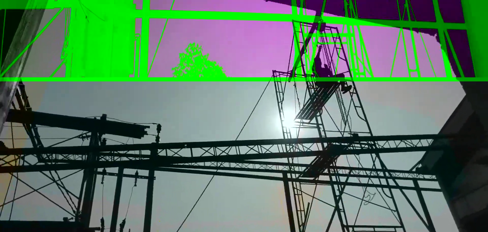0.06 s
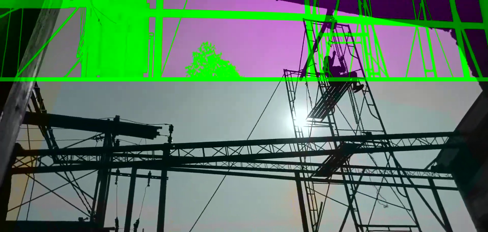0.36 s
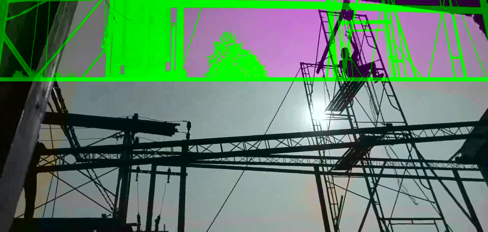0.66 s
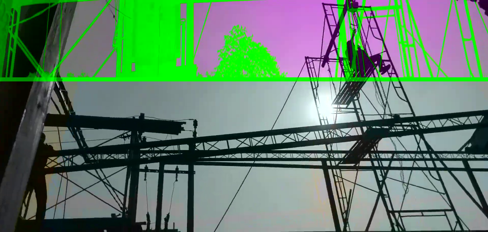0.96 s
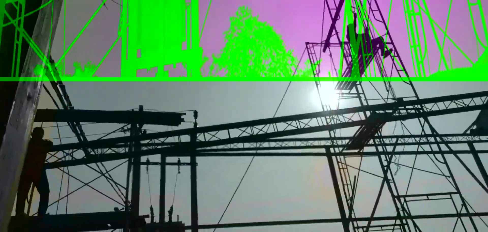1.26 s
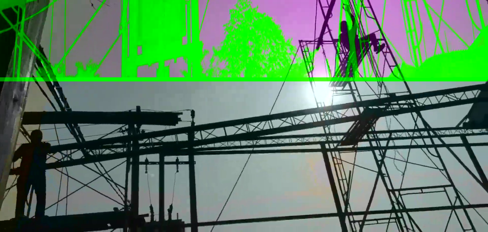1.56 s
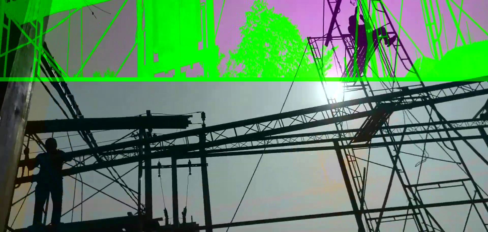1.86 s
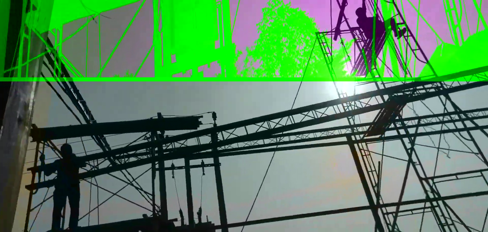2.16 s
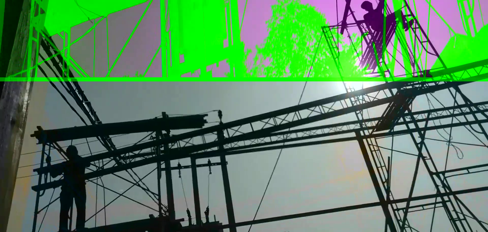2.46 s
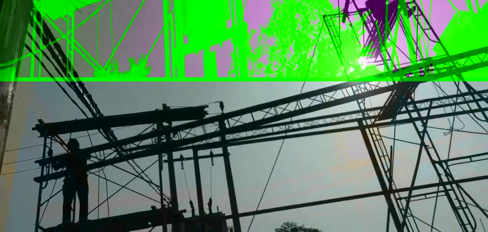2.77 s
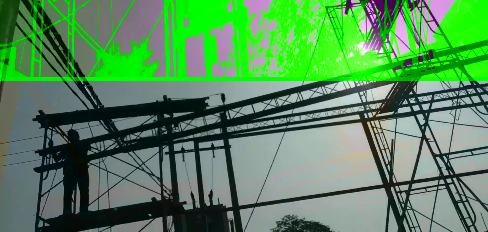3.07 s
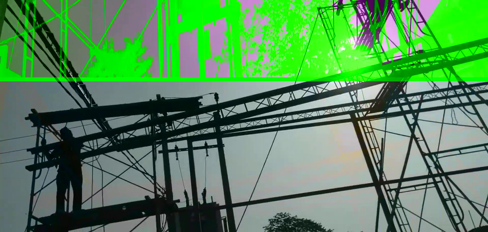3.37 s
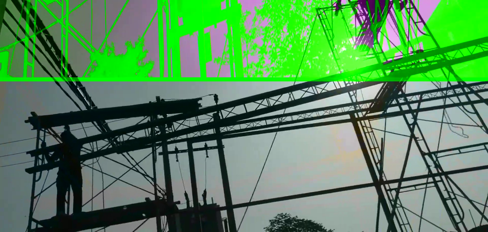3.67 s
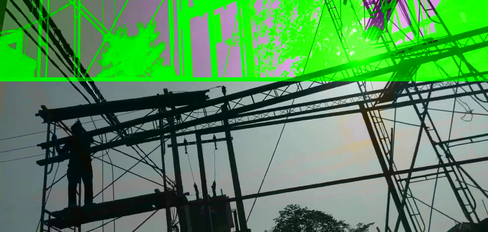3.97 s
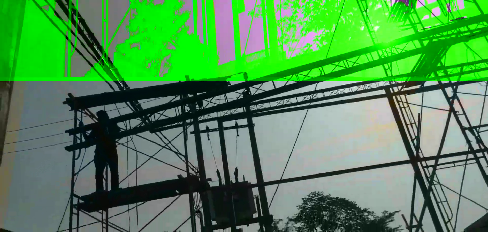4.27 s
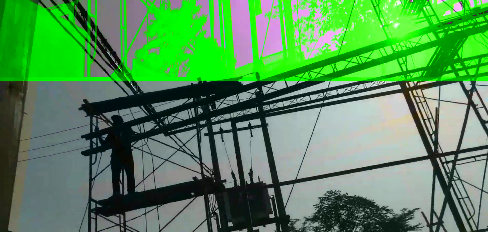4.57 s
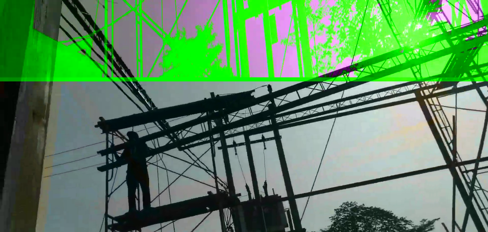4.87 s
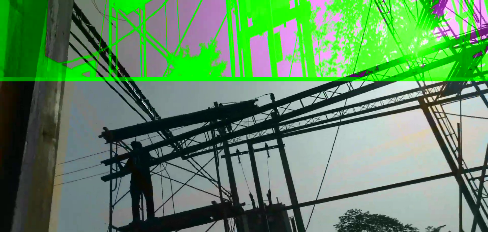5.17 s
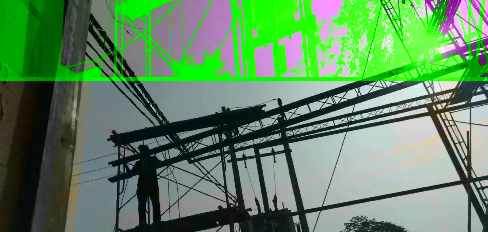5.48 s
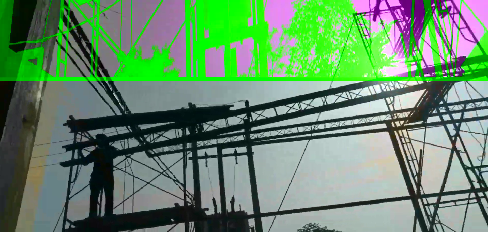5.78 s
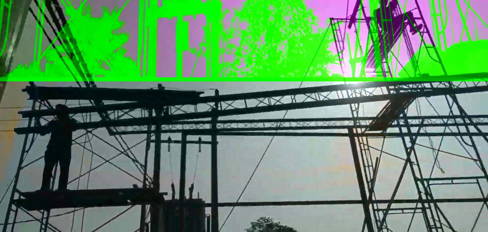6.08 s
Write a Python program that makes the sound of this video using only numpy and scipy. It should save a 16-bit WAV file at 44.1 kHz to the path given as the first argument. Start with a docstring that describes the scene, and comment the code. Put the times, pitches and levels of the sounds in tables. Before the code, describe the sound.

Chain links jingle and rattle as a hoist is hauled, while slack chain scrapes and clanks against steel scaffolding.

```python
"""Chain hoist raising a steel truss

A hand chain is hauled about twice a second up on scaffolding: links rattle over the wheel and ring
the housing. Slack chain drags, clashes and squeals on the steelwork, and the load knocks against the
frame. Walls echo it all over a low town rumble, heard from the ground through a mono phone."""
import sys
import numpy as np
from scipy import signal
from scipy.fft import rfft, irfft
from scipy.io import wavfile
from scipy.ndimage import uniform_filter1d

SR = 44100
rng = np.random.default_rng(int(sys.argv[2]) if len(sys.argv) > 2 else 0)


def wav_out(sig):
    """Save sig, one row per channel (or a flat mono array), as 16-bit PCM at SR to the path in sys.argv[1]."""
    wavfile.write(sys.argv[1], SR, np.round(np.clip(np.atleast_2d(sig).T, -1, 1) * 32767).astype(np.int16))


N = 270754
TIME = np.arange(N) / SR


def undb(db):
    """Decibels to gain."""
    return 10 ** (np.asarray(db) / 20)


def unit(x):
    """Scale to an rms of one."""
    return x / np.sqrt(np.mean(x ** 2))


def fade(t, t60):
    """Exponential decay by 60 dB in t60 seconds."""
    return np.exp(-np.log(1000) * t / t60)


def swell(middle, db, half_length):
    """A bell-shaped envelope that grows and dies away evenly around its middle."""
    return undb(db) * np.exp(-.5 * ((TIME - middle) / half_length) ** 2)


def gestures(rows, rest_db):
    """Envelope of overlapping swells over a resting level; their powers add."""
    return np.sqrt(undb(rest_db) ** 2 + sum(swell(*row) ** 2 for row in rows))


def drift(rate):
    """Smooth random modulation with an rms of one, taking a new turn `rate` times a second."""
    hold = int(SR / rate)
    steps = np.repeat(rng.standard_normal(N // hold + 1), hold)
    return unit(uniform_filter1d(steps, hold)[:N])


def convolve(x, response):
    """Pass a sound through an impulse response."""
    return signal.oaconvolve(x, response)[:len(x)]


def equalise(x, points, size=8192):
    """Minimum-phase EQ through (frequency [Hz], gain [dB]) points."""
    hz, db = np.transpose(points)
    bins_hz = np.fft.rfftfreq(size, 1 / SR)
    gain = undb(np.interp(np.log(bins_hz + 1), np.log(hz), db))
    cepstrum = irfft(np.log(gain))
    cepstrum[1:size // 2] *= 2  # folded forward, so nothing rings ahead of a hit
    cepstrum[size // 2 + 1:] = 0
    return convolve(x, irfft(np.exp(rfft(cepstrum))))


def below(x, hz):
    """The part of a sound under a frequency."""
    return signal.sosfiltfilt(signal.butter(2, hz, fs=SR, output="sos"), x)


def resonate(x, hz, width_hz, db=0, passes=1):
    """Ring one resonance; every pass steepens its skirts and applies the gain again."""
    for _ in range(passes):
        x = undb(db) * signal.lfilter(*signal.iirpeak(hz, hz / width_hz, SR), x)
    return x


def contacts(rate, spread_db):
    """Tiny impacts of uneven size, about `rate` a second."""
    hits = rng.random(N) < rate / SR
    polarity = rng.choice([-1, 1], N)
    sizes = undb(spread_db * np.clip(rng.standard_normal(N), -2, 2))
    return unit(hits * polarity * sizes)


def add(track, time, sound):
    """Mix a sound in at a time in seconds."""
    start = int(time * SR)
    track[start:start + len(sound)] += sound[:N - start]


def jingle(strikes, t60, links, modes=32):
    """Each link has its own high modes; from moment to moment another link is struck."""
    t, out = TIME[:SR // 8], np.zeros(N)
    struck_link = rng.integers(links, size=N)[np.arange(N) // 32]  # a new pick every 32 samples
    for link in range(links):
        hz = rng.uniform(2600, 15800, (modes, 1))
        partials = rng.choice([-1, 1], (modes, 1)) * np.sin(2 * np.pi * hz * t)
        ring = partials.sum(0) * fade(t, t60)
        out += convolve(strikes * (struck_link == link), ring)
    return unit(out)


# Hauls on the hand chain, each speeding up and easing off (peak time [s], level [dB], half length [s])
HAND_PULLS = [(0.0, -17, 0.052), (.2, -19.5, 0.073), (.53, -20, .11), (1.04, -18, 0.14), (1.5, -26, 0.11),
              (2.03, -18.5, 0.14), (2.5, -17.5, 0.14), (2.94, -17, 0.18), (3.44, -18, 0.15),
              (3.99, -19.5, 0.18), (4.39, -16, 0.15), (4.83, -15, 0.17), (5.28, -16.5, 0.16),
              (5.7, -17, 0.18), (6.13, -17.5, .11)]
# Bright, thin EQ of the running links (frequency [Hz], gain [dB])
RATTLE_EQ = [(300, -67), (2200, -11), (2900, -8.5), (5000, -4.5), (7500, 1.5), (10500, -2), (13000, -5.5),
             (16000, -9)]
# Ring of the hoist housing (frequency [Hz], width [Hz], gain per pass [dB])
HOUSING_MODES = [(421, 42, -10.5), (848, 260, -11.5), (1366, 170, -7), (1850, 170, -11), (2459, 116.4, -5),
                 (2962, 90, -3.5), (3320, 100, -1.5), (3596, 66, -0.5), (4269, 140, -1.5), (4667, 65, 0),
                 (5490, 320, -2), (5670, 88, -2.5), (6624, 370, -2), (7420, 77, 0.5), (7700, 380, -1),
                 (8850, 150, -2), (9880, 340, -4), (10800, 170, -2), (12300, 190, -8.5)]


def hoist(links_per_s=72, at_db=-18, doubling_db=12):
    """Links drop into the wheel and chatter, ringing chain and housing; harder is faster and louder."""
    effort = gestures(HAND_PULLS, rest_db=-28.5)  # the wheel never quite stops between pulls
    speed = 2 ** ((20 * np.log10(effort) - at_db) / doubling_db)
    link_rate = links_per_s * speed * (1 + .07 * drift(40))
    links_passed = np.cumsum(link_rate) / SR
    since_drop = links_passed % 1 / link_rate
    link_force = undb(rng.standard_normal(N)[links_passed.astype(int)])
    bursts = link_force * (fade(since_drop, t60=.042) + .33)
    bursts /= np.sqrt(uniform_filter1d(bursts ** 2, SR // 12))  # evened out, so effort sets the level
    strikes = bursts * contacts(rate=5000, spread_db=1)
    ticks = unit(strikes - below(strikes, 6800))
    chain = unit(equalise(undb(-3) * ticks + jingle(strikes, t60=.1, links=32), RATTLE_EQ))
    # as the point of contact shifts, each housing mode waxes and wanes
    housing = unit(sum(resonate(strikes, *mode, passes=2) * undb(3 * drift(9)) for mode in HOUSING_MODES))
    return effort * (undb(-.72) * chain + undb(-4.5) * housing)


# Drags of slack chain along the steelwork (peak time [s], level [dB], half length [s])
CHAIN_DRAGS = [(.04, -21, 0.14), (.6, -21, 0.23), (.99, -23.5, 0.18), (1.35, -24, 0.24),
               (1.62, -19.5, 0.11), (2.01, -22.5, 0.16), (2.34, -23.5, 0.067), (2.53, -22.5, 0.11),
               (2.92, -32.5, 0.13), (3.14, -29, 0.048), (4.49, -27, 0.037), (4.82, -24, 0.074),
               (5.05, -25, 0.12), (5.32, -22.5, .055), (5.78, -35, 0.027), (6.12, -33, .04)]
# Ring of the steel bars (frequency [Hz], width [Hz], gain [dB])
BAR_MODES = [(743, 130, -3), (1447, 80, -0.5), (1720, 160, -4.5), (1897, 200, -5), (3180, 42, 0.5),
             (3670, 23, 6.5), (4370, 47, -16), (5490, 140, -0.5), (5760, 110, 2), (6230, 79, -4.5)]
# Broad, gritty EQ of the drag (frequency [Hz], gain [dB])
DRAG_EQ = [(120, -33), (350, -10.5), (700, -3.5), (1100, -2), (1800, 0), (2700, 0), (4200, 5.5),
           (6000, 4.5), (9000, 2.5), (16000, -40)]


def slack_chain():
    """Loose links bump along the bars in uneven spurts; as they slide on, other bars take up the ring."""
    strikes = contacts(rate=4000, spread_db=3) * undb(2 * drift(60))
    bars = unit(sum(resonate(strikes, *mode) * undb(3.5 * drift(8)) for mode in BAR_MODES))
    scrape = unit(equalise(strikes + undb(-11.5) * bars, DRAG_EQ))
    return scrape * gestures(CHAIN_DRAGS, rest_db=-48)  # the hanging chain always brushes the bars


# Bass-heavy EQ of distant traffic (frequency [Hz], gain [dB])
TRAFFIC_EQ = [(25, -22), (50, -15), (62, -10), (79, 0), (105, -1), (130, -7), (200, -15), (300, -21),
              (600, -19), (1200, -26), (4000, -34)]
# Fader ride on the traffic bed (time [s], level [dB])
TRAFFIC_LEVEL = [(0, -51.5), (1.9, -47), (2.2, -54), (3.5, -50.5), (6.14, -50.5)]
# Swells of low hum (peak time [s], level [dB], half length [s], frequency [Hz])
HUM_SWELLS = [(.7, -46, 0.17, 195), (1.5, -47.5, 0.27, 196), (3.6, -52, 0.12, 139.7),
              (3.87, -50, .1, 197.5), (4.767, -42.5, 0.19, 140), (6.035, -43, 0.1, 138)]


def town():
    """Distant traffic rumbles while a wavering hum comes and goes."""
    rumble = unit(equalise(rng.standard_normal(N), TRAFFIC_EQ))
    rumble_db = np.interp(TIME, *np.transpose(TRAFFIC_LEVEL)) + 1.9 * drift(4.46)
    wavering_time = np.cumsum(1 + .013 * drift(24.96)) / SR
    hum = sum(unit(np.sin(2 * np.pi * hz * wavering_time)) * swell(time, db, half_length)
              for time, db, half_length, hz in HUM_SWELLS)
    return rumble * undb(rumble_db) + hum * undb(2 * drift(18))


# Slaps of chain on steel (time [s], level [dB], decay t60 [s], body gain [dB])
CHAIN_SLAPS = [(.003, -9.5, 0.14, 9), (.348, -11.5, 0.089, 10), (0.397, -3.5, 0.051, 4),
               (.41, -6.5, 0.24, 9), (.462, -11, 0.088, -1), (0.599, -21, 0.053, 16),
               (0.701, -7.5, 0.25, -1.5), (.944, -6.5, 0.096, -12), (1.137, -9, 0.16, 12),
               (1.492, -15, 0.055, 21.5), (1.53, -6.5, 0.29, 4), (1.64, -10, 0.17, 7),
               (1.891, -6, 0.062, 6), (1.937, -9, 0.059, 5.5), (1.976, -11, 0.036, -2),
               (3.665, -6.5, 0.072, -19), (3.675, -9.5, 0.37, -15), (4.23, -10, 0.079, -10),
               (4.246, -6, 0.059, -12), (4.644, -6.5, 0.11, -23), (4.707, -5, 0.067, -13),
               (4.733, -10, 0.19, 3), (5.489, -6, 0.1, -24)]
# Clang and sizzle EQ of a slap (frequency [Hz], gain [dB])
SLAP_EQ = [(300, -29.5), (900, -18.5), (1900, 4.5), (2800, -7.5), (5000, 2), (8000, 5.5), (11000, 2),
           (16000, -7.5)]


def clashes(crossover_hz=4240):
    """A length of chain lands: many links strike and settle; a longer piece lands more gradually."""
    t, sizzle_envelope, body_envelope = TIME[:SR // 2], np.zeros(N), np.zeros(N)
    for time, db, t60, body_db in CHAIN_SLAPS:
        attack = 1 - fade(t, t60 / 4)
        landing = undb(db) * attack * fade(t, t60)
        add(sizzle_envelope, time, landing)
        add(body_envelope, time, landing * undb(body_db))
    strikes = contacts(rate=7900, spread_db=3.5)
    steel = unit(equalise(strikes + undb(1.5) * jingle(strikes, t60=.023, links=10), SLAP_EQ))
    body = below(steel, crossover_hz)
    return sizzle_envelope * (steel - body) + body_envelope * body


# Squeals and groans of rubbed bars and links (peak time [s], frequency [Hz], level [dB], half length [s])
RUB_SQUEALS = [(0.01, 1720, -26.5, 0.026), (0.09, 5950, -20.5, 0.049), (0.51, 690, -31, 0.038),
               (0.246, 5970, -21, 0.028), (0.959, 10900, -17, 0.0067), (0.966, 6000, -22, 0.033),
               (1.105, 4320, -23, 0.086), (1.184, 1720, -25, .028), (1.583, 8500, -16, 0.034),
               (1.91, 720, -39.5, 0.053), (2.567, 923, -39.5, 0.11), (2.08, 3600, -25, 0.042),
               (2.334, 1830, -33, 0.036), (2.78, 4720, -24.5, .045), (3.14, 750, -40, 0.036),
               (5.256, 1890, -31, 0.013)]


def squeals():
    """The chain sticks and slips, feeding one mode in gritty spurts; it swells and dies away."""
    out, rubbing = np.zeros(N), contacts(rate=2800, spread_db=.5)
    for time, hz, db, half_length in RUB_SQUEALS:
        ring = unit(resonate(rubbing, hz, width_hz=.071 * hz + 50, passes=2))
        out += ring * swell(time, db, half_length)
    return out


# Blows of the load on the frame (time [s], level [dB], bass gain [dB], attack [s])
LOAD_BLOWS = [(0.352, -24.5, -36, .012), (.47, -17.5, 2, 0.042), (1.142, -14.5, -2, 0.017),
              (1.494, -25, 2.5, .012), (1.888, -31.5, 1, 0.014), (3.666, -14.5, -1, 0.015),
              (3.676, -18, 1.5, .012), (4.463, -27, -3, .012), (4.827, -26, 0, 0.025),
              (5.032, -26.5, -1.5, 0.0093), (5.315, -31, -8, .02)]
# Mid-heavy EQ of planks and tubes (frequency [Hz], gain [dB])
CLATTER_EQ = [(40, -41), (120, -18), (200, -7), (500, 0.5), (800, 3), (1050, 0.5), (1400, 9), (2000, 5),
              (2700, -3), (6000, -2), (15000, -56)]
# Ring of the frame (frequency [Hz], level [dB], decay t60 [s])
FRAME_MODES = [(156, -17, 1.6), (197, -17, 1.6), (350, -12, .48), (517, -11, .8), (710, -12, .7),
               (851, -9, .35), (1050, -7, .17), (1340, -1, .12), (1440, -4, .4), (1669, -2, .33),
               (1965, -2, .19)]


def knocks(bass_t60=1.0, mid_t60=.33):
    """The struck frame rings over a clatter of planks and tubes in which the lows last longest."""
    t, out = TIME[:SR * 2], np.zeros(N)
    for time, db, bass_db, attack in LOAD_BLOWS:
        strikes = contacts(rate=5000, spread_db=2.5)[:len(t)]
        clatter = unit(equalise(strikes, CLATTER_EQ))
        lows = below(clatter, 706)
        blow = lows * fade(t, bass_t60) + (clatter - lows) * fade(t, mid_t60)
        for hz, mode_db, t60 in FRAME_MODES:
            # each blow lands on another spot and so stirs another mix of modes
            share = rng.choice([-1, 1]) * rng.uniform(.1, .5)
            blow += share * undb(mode_db) * np.sin(2 * np.pi * hz * t) * fade(t, t60)
        blow += (undb(bass_db) - 1) * below(blow, 710)  # low shelf
        add(out, time, undb(db) * blow * (1 - fade(t, attack)))
    return out


def yard(x, t60, wet_db, predelay_s=.012):
    """Walls and scaffolding add scattered echoes behind the direct sound."""
    t = TIME[:SR]
    tail = below(rng.standard_normal(SR), 8600) * fade(t, t60) * (t > predelay_s)
    return x + undb(wet_db) * convolve(x, tail / np.linalg.norm(tail))


def scene():
    """The metalwork echoes in the yard over the town bed, the same in both channels."""
    metalwork = hoist() + slack_chain() + clashes() + squeals() + knocks()
    mono = yard(metalwork, t60=.44, wet_db=-9.5) + town()
    return np.array([mono, mono])


def record(dry):
    """The phone soft-clips the highest peaks and cuts the top."""
    ceiling, top_hz = .9, 15800
    rounded = ceiling * np.tanh(dry / ceiling)
    return signal.sosfilt(signal.ellip(10, .2, 80, top_hz, fs=SR, output="sos"), rounded)


dry = scene()
out = record(dry)
wav_out(out)
```